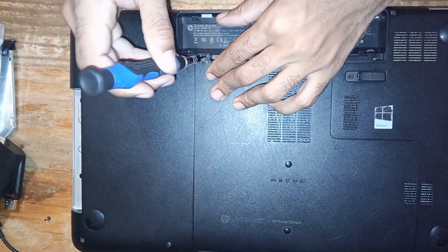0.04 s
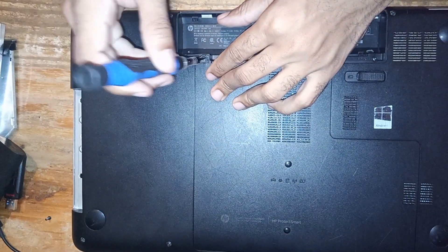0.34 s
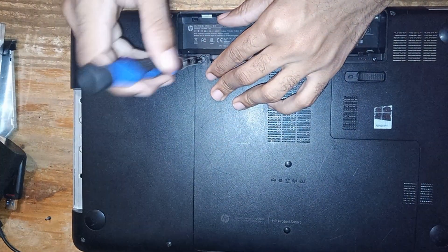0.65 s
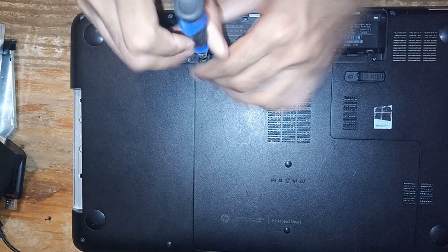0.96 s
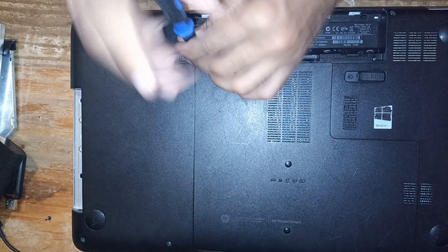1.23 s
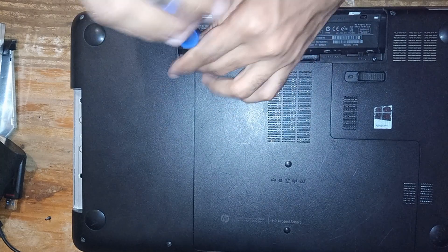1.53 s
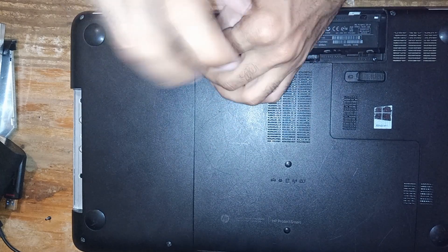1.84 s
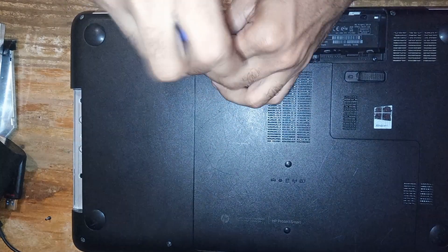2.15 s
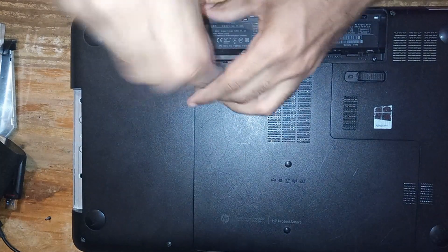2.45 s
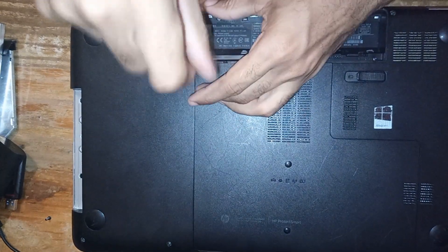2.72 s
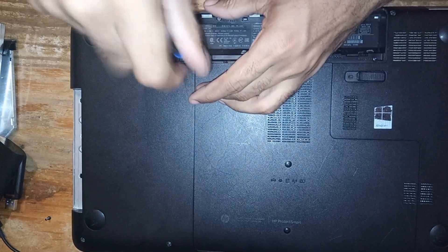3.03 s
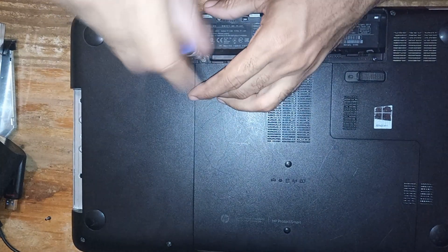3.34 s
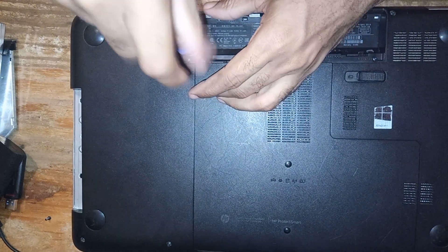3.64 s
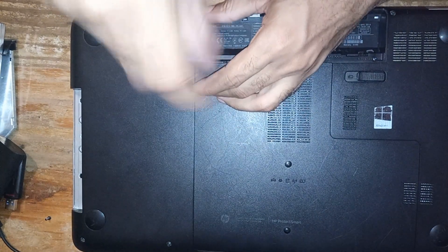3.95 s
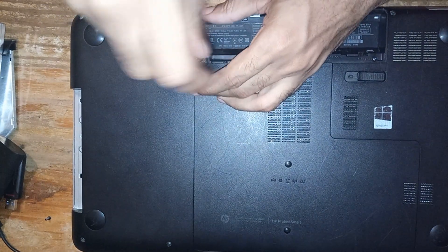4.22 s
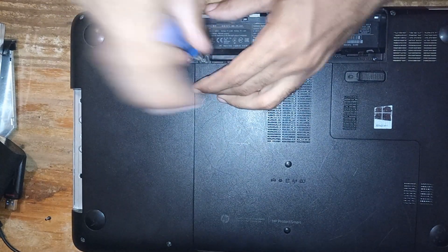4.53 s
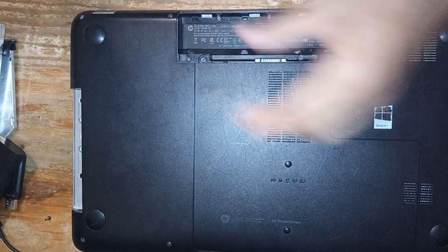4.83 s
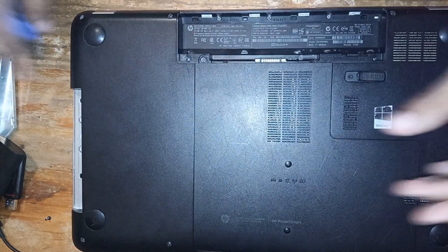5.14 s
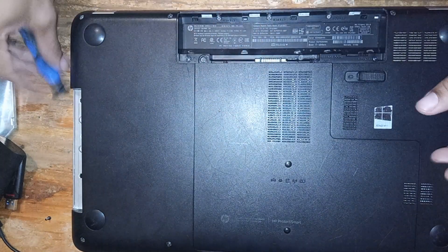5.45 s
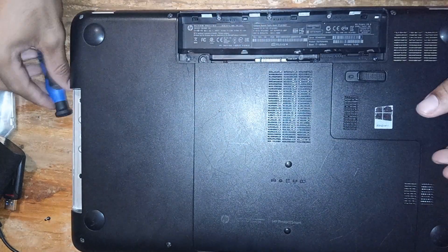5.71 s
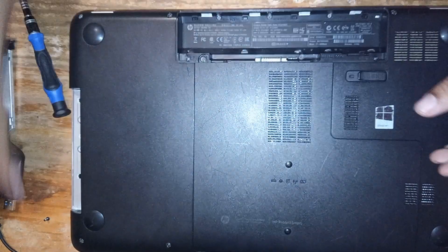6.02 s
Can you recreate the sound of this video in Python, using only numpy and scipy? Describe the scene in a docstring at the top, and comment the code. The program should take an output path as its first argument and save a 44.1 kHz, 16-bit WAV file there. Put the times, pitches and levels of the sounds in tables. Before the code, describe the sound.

A small screwdriver taps around a laptop's plastic underside, with one sharp, hollow knock as it finds the screw. It turns in short strokes, the tip clicking in the screw head and the thread rasping faintly. After a brief lull, the tool is put down on a wooden table, where it knocks loudly and rocks to rest. The sound is close, in a small room with a thin, high hiss.

```python
"""A screwdriver on a laptop

A small screwdriver is set into a screw in a laptop's plastic underside and turned in short strokes.
The tip clicks in the screw head, the thread rubs, and both make the hollow case ring. Then the tool
is put down and knocks and rocks on a wooden table. Behind it: a small room and a thin, high hiss."""
import sys
import numpy as np
from scipy import signal
from scipy.fft import rfft, irfft
from scipy.io import wavfile

SR = 44100
rng = np.random.default_rng(int(sys.argv[2]) if len(sys.argv) > 2 else 0)


def log_audio(samples):
    """Write samples as a 16-bit WAV file to the path given in sys.argv[1]."""
    # one column per channel
    frames = np.atleast_2d(samples).T
    # limit to full scale, then quantise
    limited = np.clip(frames, -1, 1)
    pcm = np.round(limited * 32767).astype(np.int16)
    wavfile.write(sys.argv[1], SR, pcm)


N = 267995

# The notes the plastic case rings with. Each row: pitch in Hz, level in dB, seconds to fade by 60 dB.
CASE_NOTES = [(73, -24, 0.11), (126, -15, 0.14), (175.6, -18.5, 0.13), (410.4, -15, .04), (401, -11, 0.054),
              (493.8, -9, 0.12), (574.6, -8, 0.12), (672.9, -9, 0.11), (787, -11, 0.045),
              (1010, -10, 0.051), (1367, -6.5, 0.017), (1676, -11.5, 0.032), (1830, -4, 0.031),
              (2320, -7, 0.018), (2800, -9.5, 0.067), (3095, -6.5, 0.032), (3830, -16, 0.044),
              (4260, -21.5, 0.014), (4360, -19.5, .04), (5060, -17.5, .025), (5930, -11, 0.014),
              (6530, -11.5, 0.013), (7750, -14.5, 0.014)]
# The tone of the noisy crack of a contact. Each row: frequency in Hz, relative level in dB.
CRACK = [(60, -20.5), (250, -11), (700, 4.5), (3500, 6), (6500, -0.5), (8500, -9), (10300, -21.5),
         (12500, -25), (14000, -30.5), (15500, -12.5)]
# First row: a rough, fading wash after the loudest knock on the case. The rest are turns of the tool.
# Each row: start and end in seconds, low thud in dB, rough sound in dB.
ROUGH_SPELLS = [(0.984, 1.1, -66, -51), (1.098, 1.274, -63, -58.5), (1.282, 1.35, -59.5, -86),
                (1.465, 1.656, -75, -69), (1.686, 1.781, -67, -61.5), (1.733, 1.853, -54.5, -68.5),
                (1.996, 2.114, -61, -77.5), (2.219, 2.368, -62.5, -71), (2.381, 2.477, -71.5, -69.5),
                (2.491, 2.606, -61.5, -62.5), (2.749, 2.851, -51.5, -59), (3.0, 3.102, -62, -60.5),
                (3.29, 3.361, -65.5, -56), (3.458, 3.559, -66.5, -76), (3.573, 3.666, -55.5, -65.5),
                (3.851, 3.952, -61, -64), (4.067, 4.143, -77, -70.5), (4.222, 4.258, -80, -65.5)]
SCREW_HZ, SOFT_PING_HZ = 561, 1801  # the case rings most here: at the screw, and under a soft touch


def undb(db):
    """Turn decibels into a gain."""
    return 10 ** (np.asarray(db) / 20)


def unit(x):
    """Scale a sound to an average (rms) level of 1."""
    return x / np.sqrt(np.mean(x ** 2) + 1e-24)


def band(x, lo_hz, hi_hz, order=3):
    """Keep the sound between two frequencies."""
    sos = signal.butter(order, [lo_hz, min(hi_hz, SR / 2 - 1000)], "band", fs=SR, output="sos")
    return signal.sosfilt(sos, x)


def noise(n, *curves):
    """Noise coloured by one or more curves of (Hz, dB) points."""
    log_hz = np.log(np.maximum(np.fft.rfftfreq(n, 1 / SR), 1))
    db = sum(np.interp(log_hz, np.log(curve[:, 0]), curve[:, 1]) for curve in map(np.array, curves))
    return irfft(rfft(rng.standard_normal(n)) * undb(db), n)


def fade(t, t60):
    """Die away by 60 dB every t60 seconds."""
    return np.exp(-np.log(1000) * t / t60)


def swell(n, edge):
    """Start and stop softly; edge is the share of the time spent rising and falling."""
    return signal.windows.tukey(n, edge)


def add(out, start, x):
    """Mix x into out at a time in seconds."""
    i = max(int(start * SR), 0)
    out[i:i + len(x)] += x[:max(len(out) - i, 0)]


def pulses(n, per_s, spread_db, edge):
    """Tiny pushes of uneven size at random moments."""
    return (rng.random(n) < per_s / SR) * undb(spread_db * rng.standard_normal(n)) * swell(n, edge)


def room(wash, t60, delay_s=0.0071, build_s=0.0011):
    """The walls answer a moment later with a blurred, fading echo."""
    t = np.arange(len(wash)) / SR
    return unit(wash) * np.clip((t - delay_s) / build_s, 0, 1) * fade(t, t60)


def ring(notes, crack_db, crack_t60, spot_hz, ping_hz, spot_db=14.5, ping_db=10.5, scatter_db=3.5):
    """A struck object cracks and rings. The spot hit boosts a low note; the contact, a high ping."""
    t = np.arange(SR // 4) / SR
    out = undb(crack_db) * noise(len(t), CRACK) * fade(t, crack_t60)
    for (hz, db, t60), (size, detune, side) in zip(notes, rng.standard_normal((len(notes), 3))):
        near_spot, near_ping = np.exp(-(np.log(hz / np.array([spot_hz, ping_hz])) / 0.059) ** 2)
        gain = undb(db + scatter_db * size + spot_db * near_spot + ping_db * near_ping)
        out += np.sign(side) * gain * np.sin(2 * np.pi * hz * (1 + 0.022 * detune) * t) * fade(t, t60)
    return out


def blows(hits, notes, shape_db, crack_db, crack_t60, skid_db, room_db,
          blur_db=-2.5, shade=0.12, thinning=0):
    """A tip skids, lands and rings an object. The harder the contact, the more treble it has."""
    # Five bands: thump, body, clack, tick, snap. Each row: low edge and high edge in Hz.
    bands = [(50, 250), (260, 1100), (1100, 4500), (4500, 9500), (9500, 15500)]
    # The echo in those bands. Each row: seconds to fade by 60 dB, relative level in dB.
    echoes = [(0.5, -5), (0.32, -8.5), (0.24, -7.5), (0.22, -3.5), (.25, -12)]
    out = np.zeros(N)
    lead, wash_n = int(0.03 * SR), SR // 2
    attack = slice(int(0.028 * SR), int(0.04 * SR))
    until_hit_s = np.arange(lead, 0, -1) / SR
    filters = [signal.butter(4, edges, "band", fs=SR, output="sos") for edges in bands]
    centres = np.log2(bands).mean(axis=1)
    octaves = np.clip(centres, centres[1], centres[-2]) - centres[1]  # counted from body up to tick
    for start, hit_db, hardness, spot_hz, ping_hz, skid_s in hits:
        levels = hit_db + np.array(shape_db) + hardness * octaves
        levels[2] += thinning * (-40.5 - hit_db)  # a light touch hardly bends the case: more clack
        skid = undb(skid_db) * noise(lead, CRACK) * 10 ** (-until_hit_s / skid_s)
        contact = np.concatenate([skid, ring(notes, crack_db, crack_t60, spot_hz, ping_hz)])
        # Countless echoes repeat the ring; the far ones keep only its rough tone.
        near = irfft(rfft(contact, wash_n) * rfft(rng.standard_normal(wash_n)), wash_n)
        wash = unit(near) + undb(blur_db) * unit(noise(wash_n, CRACK, notes))
        # The cupped hand shades light touches, so less of them reaches the walls.
        send_db = room_db + shade * min(max(levels) + 38, 0)
        for sos, db, (t60, echo_db) in zip(filters, levels, echoes):
            direct = signal.sosfilt(sos, contact)
            add(out, start - lead / SR, direct * undb(db) / np.std(direct[attack]))
            add(out, start, room(signal.sosfilt(sos, wash), t60) * undb(db + echo_db + send_db))
    return out


def background():
    """Steady room noise, with a microphone's narrow hiss near 6900 Hz."""
    # The tone of the noise. Each row: frequency in Hz, level in dB per Hz.
    tone = [(20, -118), (70, -101), (170, -104), (600, -113), (2500, -122), (6100, -123), (6600, -108),
            (6900, -94.5), (7300, -101), (7950, -128), (13500, -133), (15200, -123), (16200, -138)]
    return noise(N, tone) * np.sqrt(SR / 2)


def fingers():
    """Skin brushes the textured lid with a soft hiss."""
    # Finger slides. Each row: start and end in seconds, rough pitch in Hz, level in dB.
    slides = [(0.24, 0.3, 1360, -62), (0.376, 0.607, 1280, -62.5), (5.156, 5.267, 1185, -53.5),
              (5.199, 5.253, 570, -59.5)]
    out = np.zeros(N)
    for start, end, hz, db in slides:
        n = int((end - start) * SR)
        hiss = unit(band(rng.standard_normal(n), hz / 1.37, hz * 1.115, order=2))
        add(out, start, hiss * np.hanning(n) * undb(db))
    return out


def grainy_sounds():
    """The tip scrapes out of the screw. Later a grainy wash lingers after a hard tap and stops short."""
    # Each row: start and end in seconds, low and high edge in Hz, level in dB.
    spells = [(4.66, 4.684, 3400, 7900, -54), (5.547, 5.665, 1550, 4400, -58)]
    out = np.zeros(N)
    t = np.arange(SR // 20) / SR
    for start, end, lo_hz, hi_hz, db in spells:
        n = max(int((end - start) * SR), 500)
        pushes = pulses(n, per_s=900, spread_db=4, edge=0.43)
        grain = rng.standard_normal(len(t)) * fade(t, t60=0.017)
        grains = band(signal.fftconvolve(pushes, grain), lo_hz, hi_hz, order=4)
        add(out, start, grains * undb(db) / (np.std(grains[:n]) + 1e-9))
    return out


def table_knocks():
    """Hard taps ring the wood, then the softer, heavier handle drops and rocks to rest."""
    # The notes of the table top. Each row: pitch in Hz, level in dB, seconds to fade by 60 dB.
    wood_notes = [(70.4, -15.5, 0.067), (89, -7, 0.076), (120.3, -3.5, 0.072), (173, -5.5, 0.13),
                  (292.8, -22.5, 0.33), (340, 2, 0.027), (398, -4.5, 0.1), (494, 2.5, 0.038),
                  (644, -3, 0.057), (771, -2, 0.03), (849, -4, 0.047), (1060, -12, 0.075),
                  (1512, -10, 0.037), (1700, -2.5, 0.033), (2193, -3.5, 0.017), (2670, -2.5, 0.027),
                  (3146, -3, 0.023), (3700, -7.5, 0.0045), (4500, -11, 0.01)]
    # Each row: start in seconds, base level in dB, hardness in dB per octave, boosted note in Hz.
    tap_rows = [(5.194, -51.5, -7, 1070), (5.5298, -30, -3, 748)]
    bounce_rows = [(5.7091, -22, -6, 740), (5.7153, -39, -1.5, 624), (5.8047, -30.5, -7, 362.5),
                   (5.869, -33, -8.5, 560), (5.9023, -40.5, -5.5, 377), (5.9202, -46.5, -4, 400),
                   (6.0079, -44.5, -9.5, 358), (6.0655, -46, -11, 306)]
    # The tone of each: dB added to the five bands, thump to snap.
    tap_shape = [-32.5, -0.5, 7.5, -5.5, -20]
    bounce_shape = [-13, -0.5, -7, -4, -8.5]
    taps = [(*row, 2310, 0.00044) for row in tap_rows]  # adds ping in Hz and skid in seconds
    bounces = [(*row, 1490, 0.0036) for row in bounce_rows]
    tapping = blows(taps, wood_notes, tap_shape, crack_db=4, crack_t60=0.02,
                    skid_db=3, room_db=2.5, blur_db=0.5, shade=0)
    rocking = blows(bounces, wood_notes, bounce_shape, crack_db=2, crack_t60=0.018,
                    skid_db=4.5, room_db=2.35, blur_db=1, shade=0)
    return tapping + rocking


def case_knocks(hard_above=-2.5, hard_ping_hz=6340):
    """The tip hunts for the screw and the fingers shift, knocking the case at different spots."""
    # Each row: start in seconds, base level in dB, hardness in dB per octave, boosted note in Hz,
    # skid in seconds.
    knocks = [(0.0632, -46, 1, 774, 0.005), (0.2644, -63.5, -4.5, 697, 0.0095),
              (0.3257, -70, 2.5, 673, 0.0059), (0.5395, -60.5, -1.5, 653, 0.01),
              (0.556, -64, 0, 670, 0.0054), (0.6223, -74.5, 6, 540, 0.0012),
              (0.6445, -40.5, -6, 550, 0.0075), (0.677, -42.5, -2.5, 532, 0.0021),
              (0.8094, -35, -5, 623, 0.0047), (0.9247, -41.5, -6, 571, 0.0026),
              (0.9594, -28.5, -8, 530, 0.0044), (0.9717, -22, -2.5, 540, 0.0022),
              (1.1399, -46.5, -3.5, 538, 0.017), (1.1892, -54, -4.3, 670, 0.0058),
              (1.2289, -57, -4.5, 781, 0.0037), (1.264, -60.5, -2, 547, 0.0019),
              (1.2788, -47.5, 0.86, 571, 0.0029), (1.4002, -56.5, -6, 590, 0.0023),
              (1.5402, -44, -6, 520, 0.012), (1.5535, -52, -4, 560, .002), (1.6468, -57.5, 0, 673, 0.0044),
              (1.6769, -49, -10.5, 565, 0.0025), (1.7597, -47, -1.05, 626, 0.0048),
              (1.9911, -73.5, 0, 740, .008), (2.1084, -33.5, -7.5, 576, 0.0039),
              (2.2437, -56.5, -5, 581, 0.005), (2.6484, -52, -4.5, 583, 0.0072),
              (5.3089, -52.5, 0.2, 638, .003)]
    # A knock's tone: dB added to the five bands, thump to snap.
    shape = [-21.5, 0.5, 2.5, 0, -14.5]
    hits = [(start, db, hardness, hz, hard_ping_hz if hardness > hard_above else SOFT_PING_HZ, skid_s)
            for start, db, hardness, hz, skid_s in knocks]
    return blows(hits, CASE_NOTES, shape, crack_db=-1.5, crack_t60=0.035,
                 skid_db=3.5, room_db=-2, blur_db=-2, shade=0.045, thinning=0.2)


def tip_clicks(ping_hz=7730):
    """Steel slips on steel in the screw head: a low note from the case and a thin, high ping."""
    # Each row: start in seconds, base level in dB, hardness in dB per octave, skid in seconds.
    clicks = [(3.034, -49, -3, .004), (3.0622, -53.5, -2.5, 0.004), (3.3043, -47.5, -9.5, 0.01),
              (3.3262, -49, -7, .002), (3.4793, -66, 0.5, 0.0092), (3.6241, -50.5, -2.5, 0.0026),
              (3.666, -57, -3, 0.0023), (3.798, -66, 1, 0.019), (3.8564, -58.5, -0.26, 0.0017),
              (3.9158, -57.5, -3.5, 0.0023), (4.094, -55, -3, .008), (4.1236, -74.5, 3, 0.0089),
              (4.1853, -71, 0, .007), (4.2452, -66.5, -2, 0.011), (4.6723, -72.5, 4, 0.018)]
    # A click's tone: dB added to the five bands, thump to snap.
    shape = [-22.5, 0.5, 0, 0, -18]
    hits = [(start, db, hardness, SCREW_HZ, ping_hz, skid_s) for start, db, hardness, skid_s in clicks]
    return blows(hits, CASE_NOTES, shape, crack_db=-7, crack_t60=0.042,
                 skid_db=-0.5, room_db=-1, blur_db=-4, shade=0.086)


def faint_ticks(per_s=14, hardness=-1.5, skid_s=0.0081):
    """Ticks dot the rough spells and follow their level. During a turn, this is the thread catching."""
    # A tick's tone: dB added to the five bands, thump to snap.
    shape = [-18.5, 0.5, 0.5, -3, -17.5]
    hits = []
    for start, end, _, rough_db in ROUGH_SPELLS:
        for _ in range(int((end - start) * per_s)):
            when = rng.uniform(start, end)
            db = rough_db + rng.normal(0.5, 0.5)
            hits.append((when, db, hardness, SCREW_HZ, SOFT_PING_HZ, skid_s))
    return blows(hits, CASE_NOTES, shape, crack_db=-2.5, crack_t60=0.04, skid_db=4.5, room_db=1.5)


def wash_and_turns(grit_fall_db_per_s=2.5):
    """A rough wash, then turns: the thread sticks and slips, ringing the case, and the hand thuds."""
    out = np.zeros(N)
    speck = fade(np.arange(SR // 4) / SR, t60=0.0061)
    for start, end, thud_db, rough_db in ROUGH_SPELLS:
        # The thread runs smoother as the screw goes in.
        grit_db = rough_db - 1 - grit_fall_db_per_s * (start - ROUGH_SPELLS[0][0])
        n = max(int((end - start) * SR), 500)
        pushes = pulses(n, per_s=700, spread_db=2.5, edge=0.49)
        creak_hz = rng.choice((1850, 1850, 1850, 3080))  # a fresh grip for each turn
        panel = ring(CASE_NOTES, crack_db=-11, crack_t60=0.012, spot_hz=555, ping_hz=creak_hz,
                     spot_db=11.5, ping_db=1.5, scatter_db=0.7)
        rough = signal.fftconvolve(pushes, panel)
        specks = signal.fftconvolve(pushes, speck) * noise(len(rough), CRACK)  # a noise burst per push
        grit = unit(rough) + undb(-14) * unit(specks)
        for part, db in ((band(rough, 400, 900), rough_db), (band(grit, 1300, 8000), grit_db)):
            add(out, start, part * undb(db) / (np.std(part[:n]) + 1e-9))
        thud = unit(band(rng.standard_normal(n + SR), 50, 140, order=5)[-n:])
        add(out, start, thud * swell(n, 0.31) * undb(thud_db))
    return out


def scene():
    """Work on the case and knocks on the table, over the steady noise, in one channel."""
    mix = (background() + case_knocks() + tip_clicks() + table_knocks()
           + fingers() + wash_and_turns() + grainy_sounds() + faint_ticks())
    return mix[None]


def record(dry, top_hz=16300):
    """Cut off the very highest treble."""
    return signal.sosfilt(signal.ellip(8, 0.2, 70, top_hz, fs=SR, output="sos"), dry)


dry = scene()
out = record(dry)
log_audio(out)
```